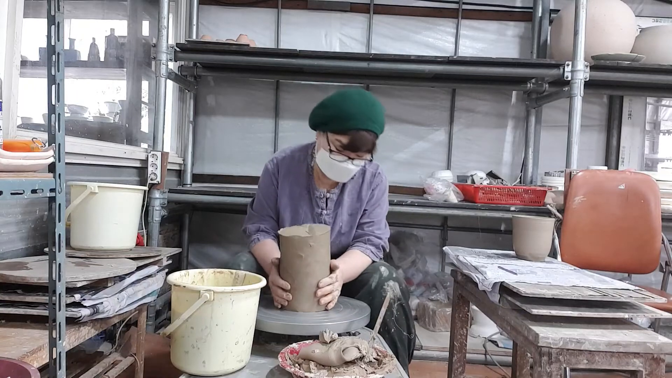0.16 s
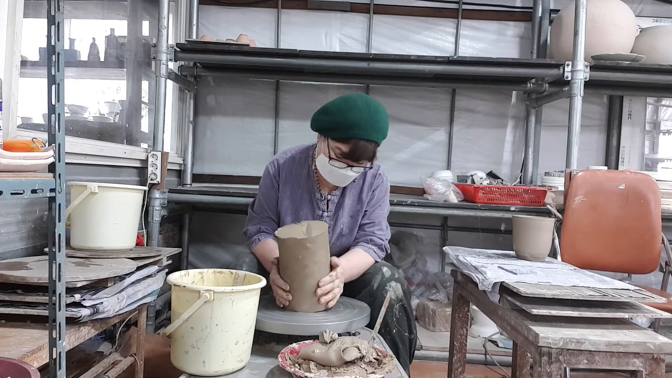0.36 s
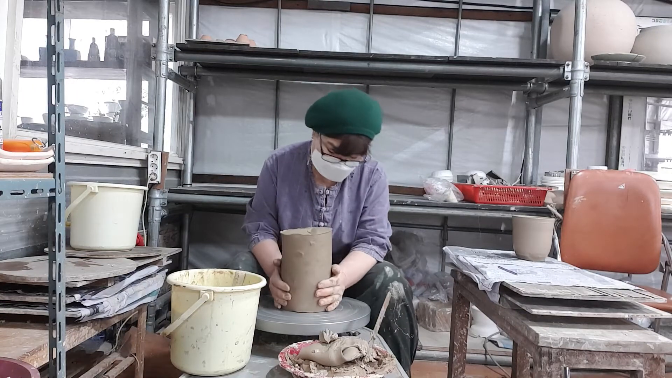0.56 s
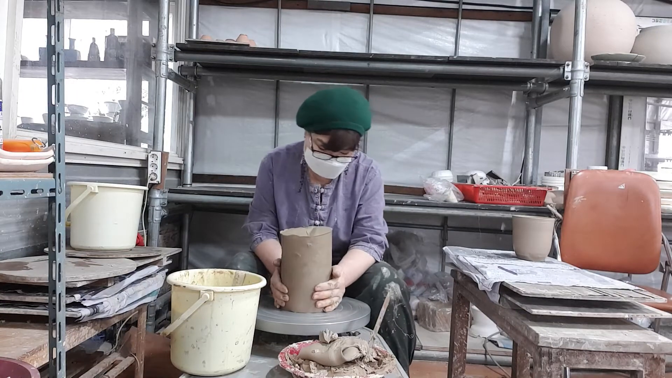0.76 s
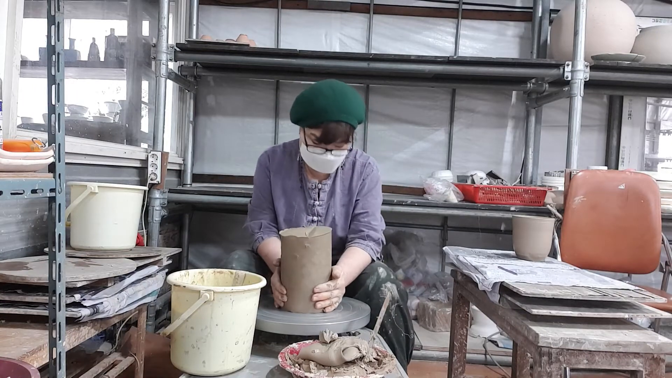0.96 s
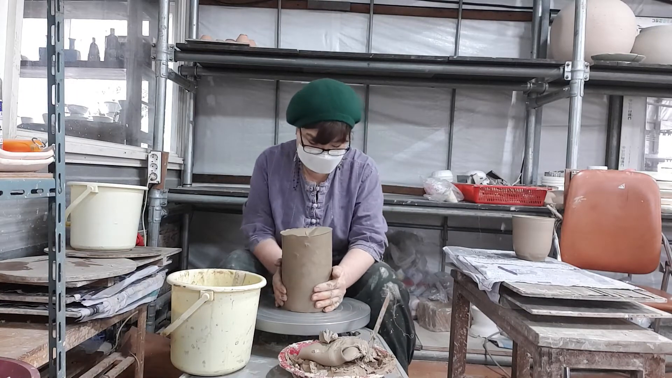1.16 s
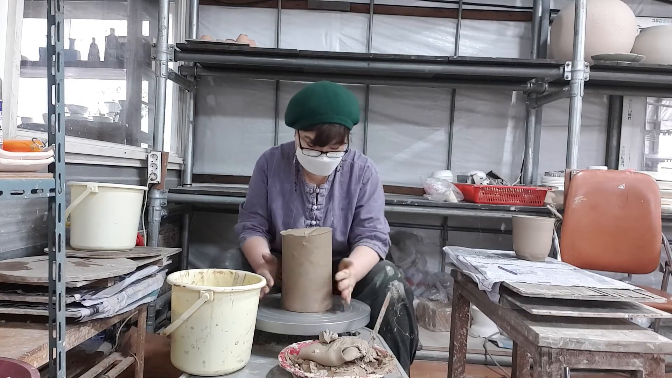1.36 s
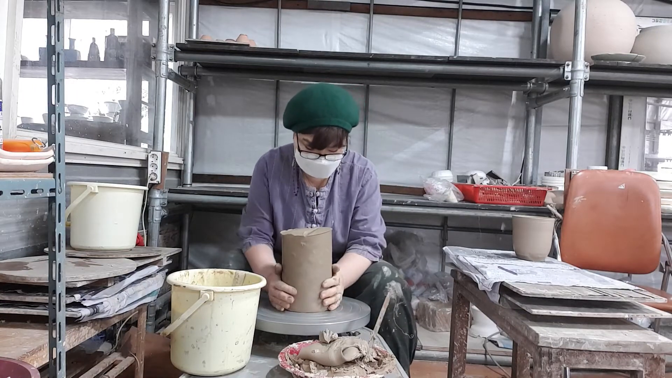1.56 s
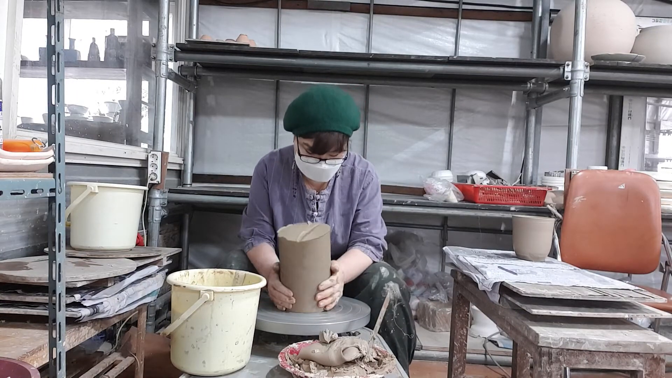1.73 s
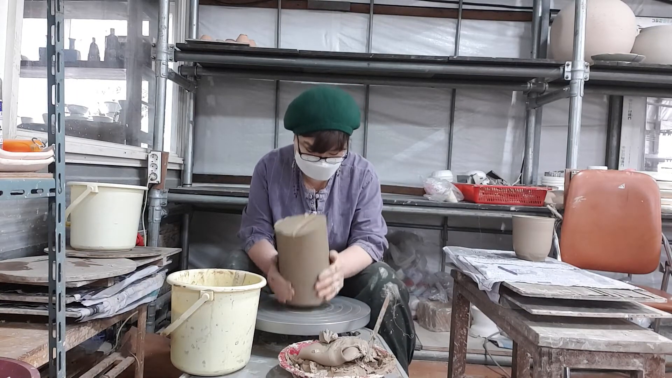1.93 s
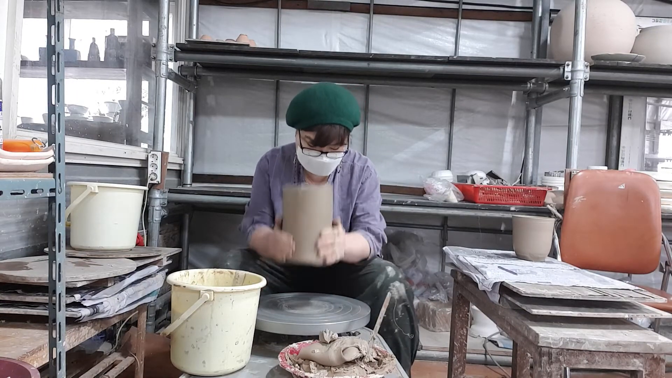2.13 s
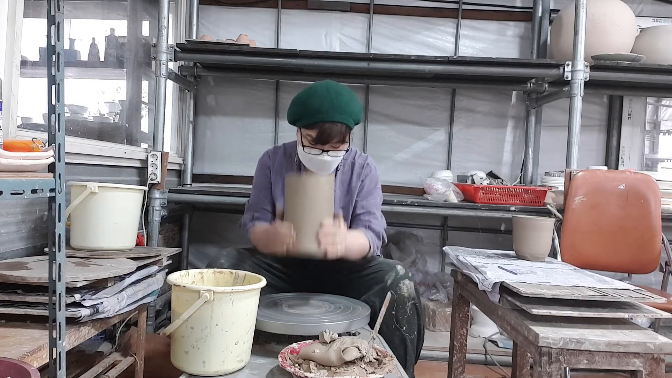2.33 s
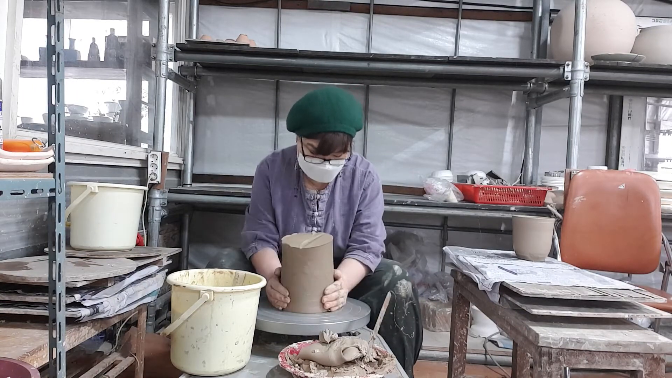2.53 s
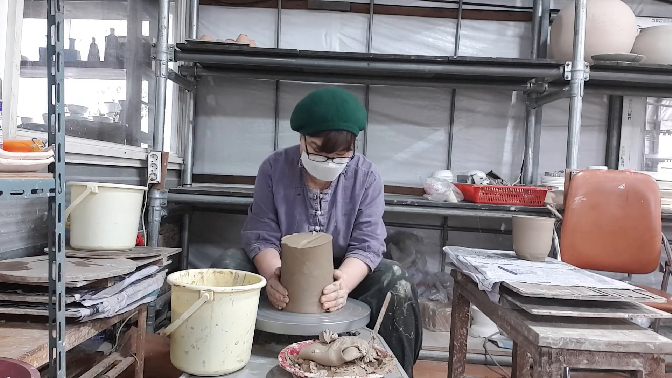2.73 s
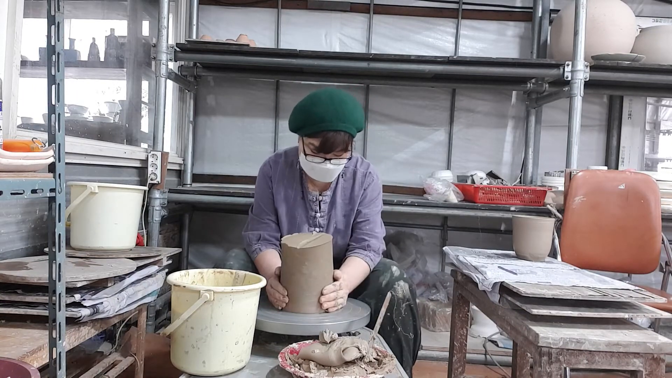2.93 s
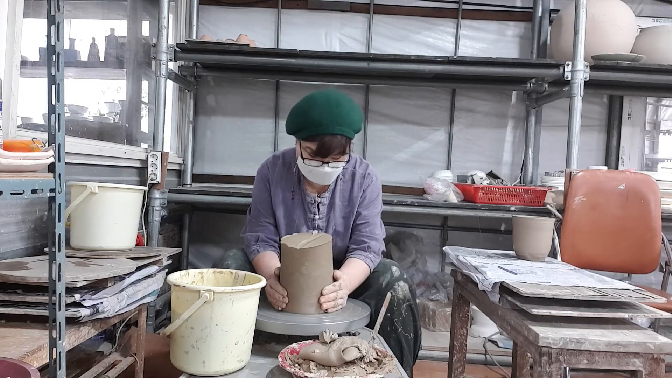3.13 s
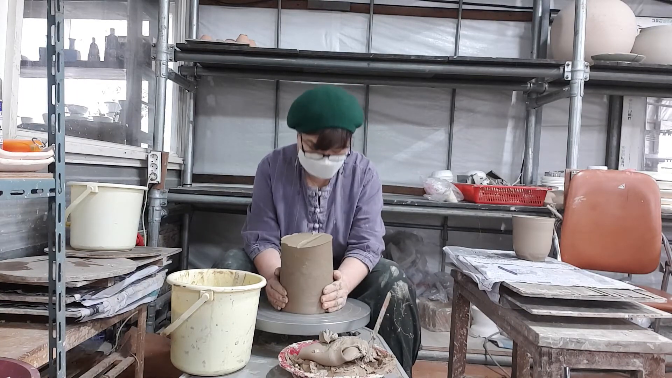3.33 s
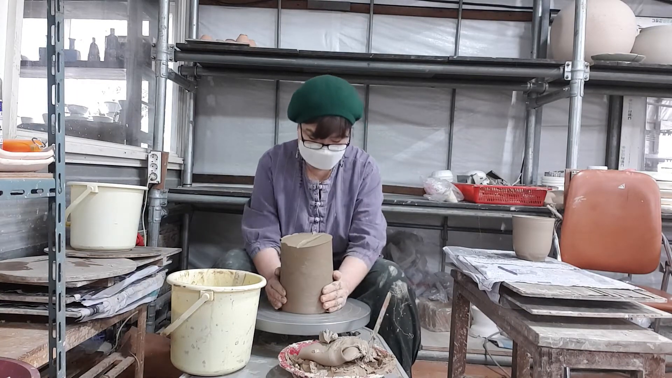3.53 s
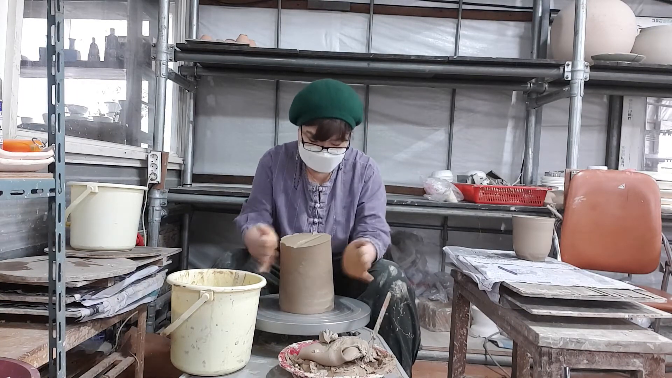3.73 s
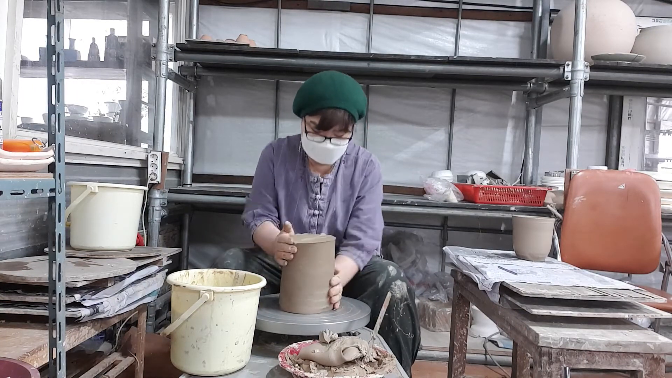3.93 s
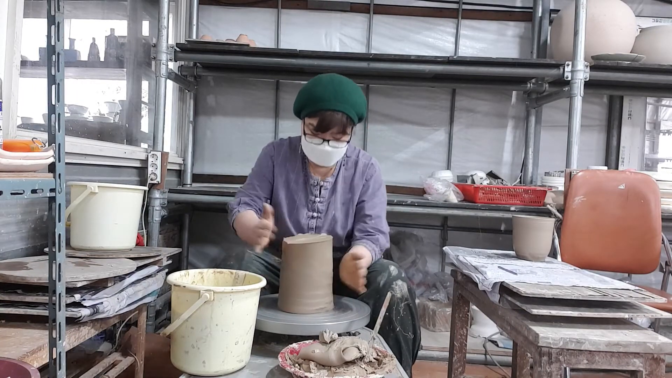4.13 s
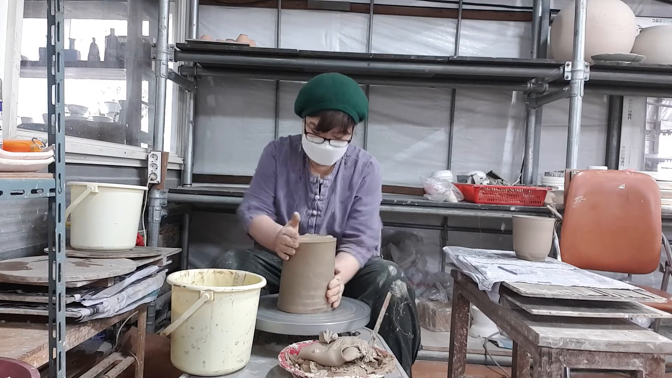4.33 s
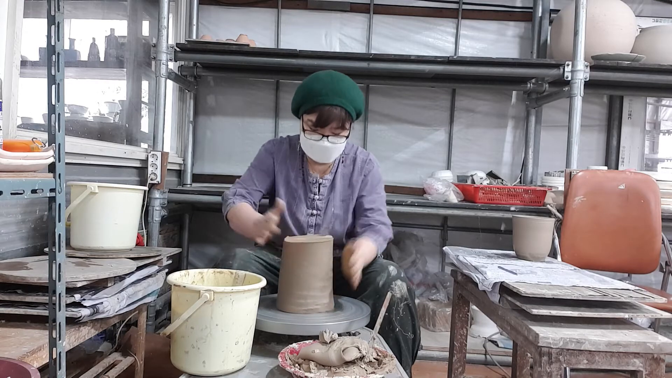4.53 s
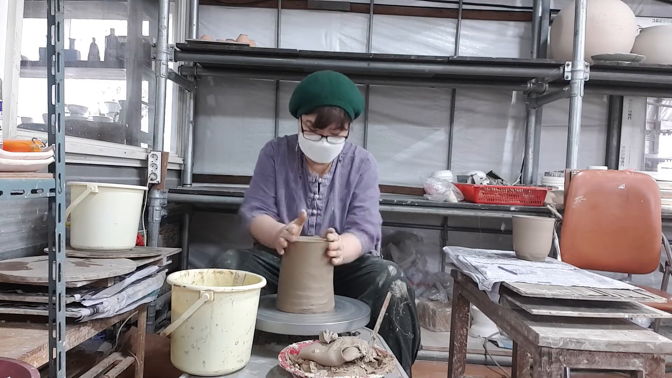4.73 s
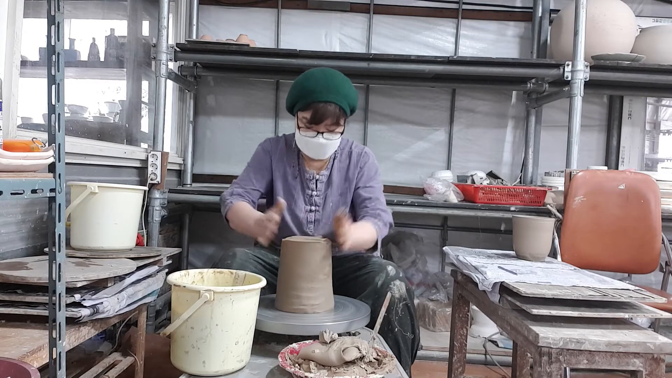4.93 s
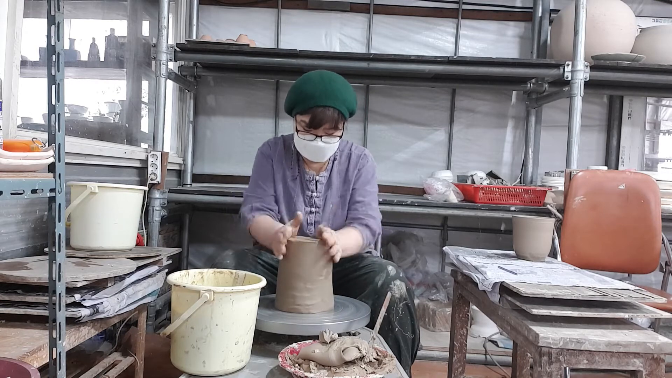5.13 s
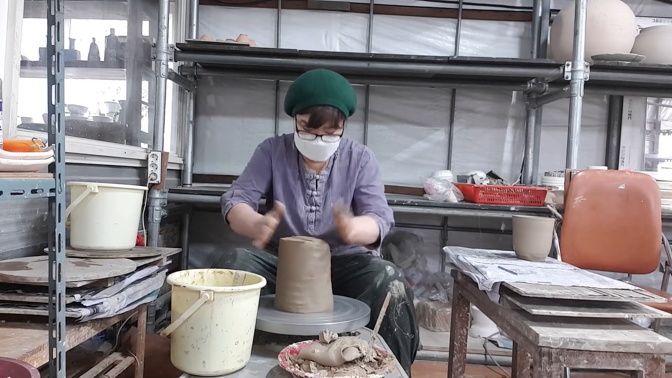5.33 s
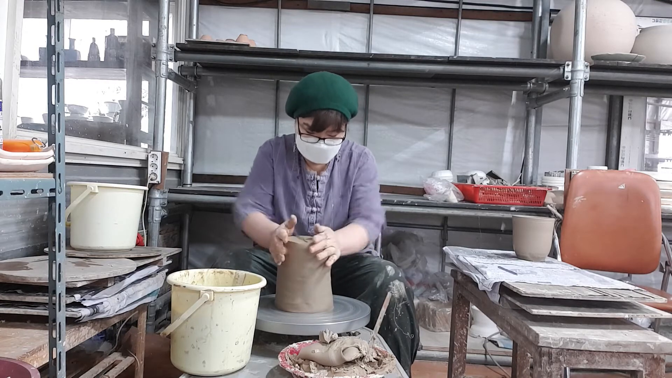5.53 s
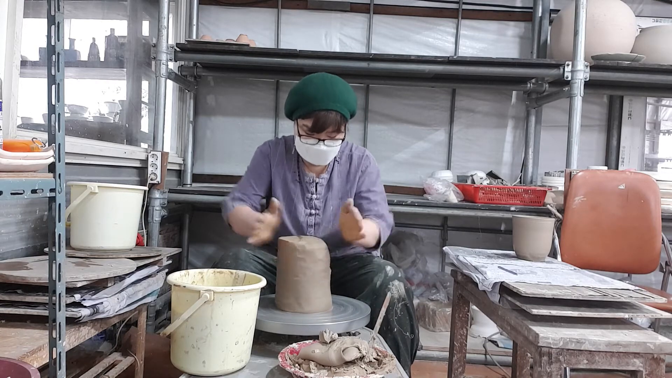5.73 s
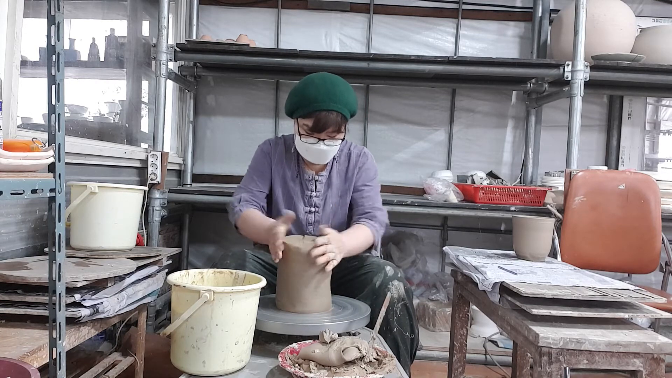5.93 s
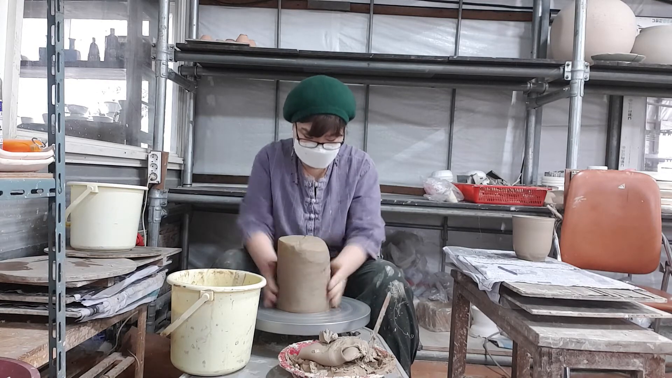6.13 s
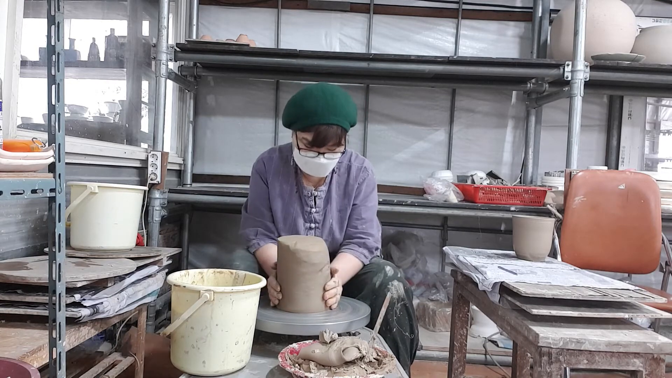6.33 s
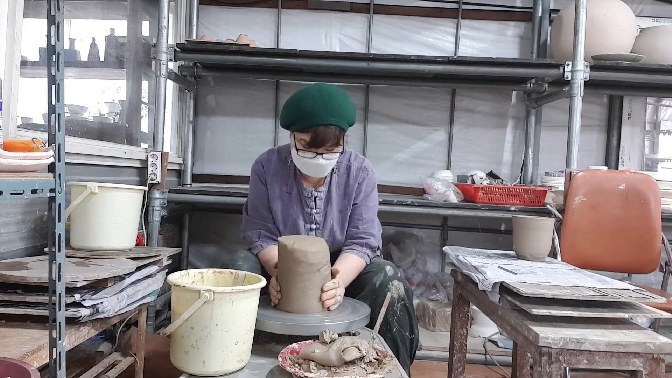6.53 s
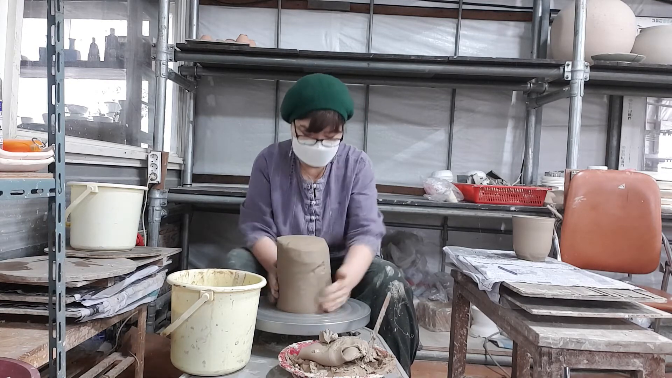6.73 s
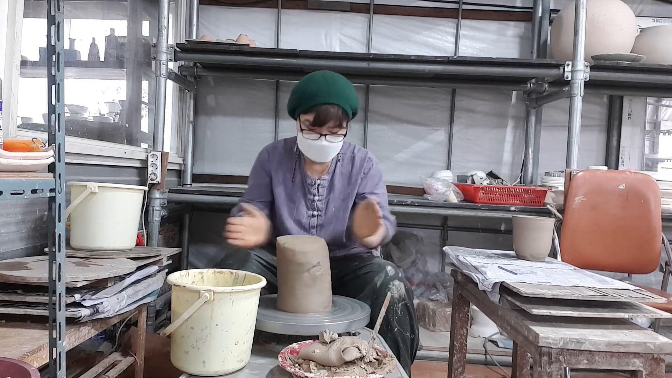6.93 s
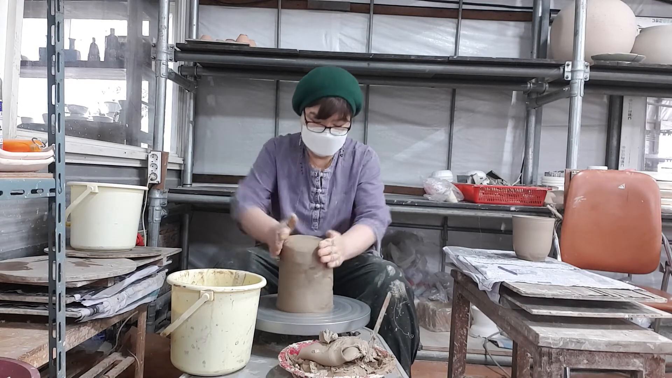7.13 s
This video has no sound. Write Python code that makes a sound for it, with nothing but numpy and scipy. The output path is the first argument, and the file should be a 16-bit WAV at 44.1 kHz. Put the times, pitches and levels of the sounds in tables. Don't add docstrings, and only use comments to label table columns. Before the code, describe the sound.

Beside a potter's wheel in a thin-walled shed, traffic rumbles beyond the walls. Wet palms hiss faintly over clay, then the lump drops with a heavy smack, metallic ring and floor thump. After a pause come uneven pats and hard slaps, with dull scraping between them. The loudest slap arrives near the end with a faint bearing squeak. Close stereo microphone, short bright room tail.

```python
import sys
import numpy as np
from scipy import signal
from scipy.fft import rfft, irfft, next_fast_len
from scipy.io import wavfile
from scipy.ndimage import uniform_filter1d, map_coordinates

SR = 44100
rng = np.random.default_rng(int(sys.argv[2]) if len(sys.argv) > 2 else 0)


def transcribe(signal):
    frames = np.atleast_2d(signal).T
    limited = np.clip(frames, -1, 1)
    pcm = np.round(limited * 32767).astype(np.int16)
    wavfile.write(sys.argv[1], SR, pcm)


def convert_level_to_amplitude(level_db):
    exponent = np.asarray(level_db, float) / 20
    return 10 ** exponent


N = 320827


def unit(x):
    return x / np.sqrt(np.mean(x ** 2) + 1e-20)


def along(points, hz):
    f, v = np.transpose(points)
    return np.interp(np.log(hz + 1), np.log(f + 1), v)


def curves(rows):
    s, *cols = np.transpose(rows)
    return [np.interp(np.arange(N) / SR, s, c) for c in cols]


def wobble(rate):
    step = max(1, int(SR / rate / 16))
    coarse = np.arange(0, N + step, step)
    knots = rng.standard_normal(int(N * rate / SR) + 4)
    smooth = map_coordinates(knots, [coarse * rate / SR], mode="nearest")
    return np.interp(np.arange(N), coarse, smooth)


def stroke(s, db, rise, fall):
    t = np.arange(N) / SR - s
    return convert_level_to_amplitude(db + 20 * np.minimum(t / rise, -t / fall))


def filtered(x, response):
    n = x.shape[-1]
    m = next_fast_len(n + 8192)
    return irfft(rfft(x, m) * response(np.fft.rfftfreq(m, 1 / SR)), m)[..., :n]


def causal(points):
    ceps = irfft(np.log(convert_level_to_amplitude(along(points, np.fft.rfftfreq(1024, 1 / SR)))))
    ceps[1:512] *= 2
    ceps[513:] = 0
    return irfft(np.exp(rfft(ceps)))[:512]


def add(out, sound, s):
    part = out[:, round(s * SR):][:, :sound.shape[1]]
    part += sound[:, :part.shape[1]]


# frequency in Hz, left-right correlation.
ALIKE = [(60, 0.84), (130, 0.9), (290, 0.91), (640, 0.31), (1410, -0.27), (3100, 0.13), (15000, -0.11)]


def rush(spectrum, patchy_db):
    z = signal.stft(rng.standard_normal((2, N)), nperseg=512)[2]
    field = uniform_filter1d(rng.standard_normal(z.shape[1:]), size=5, axis=0)
    field = uniform_filter1d(field, size=12, axis=1)
    pair = signal.istft(z * convert_level_to_amplitude(patchy_db * unit(field)), nperseg=512)[1][:, :N]

    def mid_side(hz):
        turn = np.arccos(np.clip(along(ALIKE, hz), -1, 1)) / 2
        return convert_level_to_amplitude(along(spectrum, hz)) * [np.cos(turn), np.sin(turn)]

    mid, side = filtered(pair, mid_side)
    return unit(np.array([mid + side, mid - side]))


# time in seconds, nearness as tyre roar in dB, speed as extra sizzle in dB.
ROAD = [(0, -55.5, 2), (.63, -57, 0), (1.01, -54, -1), (1.27, -51, .6), (1.62, -48, 3), (1.8, -46.5, 2),
        (2.09, -48.5, 3), (2.4, -45.5, 0), (2.83, -48.5, 0), (3.2, -47.5, 0), (3.58, -49.5, 3),
        (3.85, -47.5, 0), (4.47, -48, -2), (4.94, -45.5, 1.5), (5.61, -48, -1), (5.95, -50, 1),
        (6.66, -54, -3), (7.27, -53, -1)]
# time in seconds, deep surge in dB, exhaust surge in dB.
SURGES = [(.58, 3.5, 1.5), (.82, -3, -3), (1.02, 2.5, 0), (1.6, 9, 0), (2.09, 10, 3), (2.3, 3, 1),
          (2.83, 4, 3), (3.08, -5, 0), (3.3, 1, -2), (4.17, 7.5, -1.5), (4.6, 2.5, 0), (4.94, 8.5, 1),
          (5.18, 0, 3.5), (5.61, 1.5, 4.5), (5.85, 3, -1), (6.05, 4, 6), (7.27, 4, 0)]
# frequency in Hz, level in dB per Hz.
DEEP = [(15, -44), (28, -16.5), (45, -2), (65, -2), (90, -6), (130, -30), (300, -85.5)]
BOOM = [(50, -50), (85, -2.5), (125, -0.5), (165, -6), (210, -3.5), (270, -10), (400, -28), (900, -90.5)]
TYRES = [(150, -50), (280, -5.5), (450, -4), (650, -5.5), (900, -1), (1150, -6.5), (1600, -14.5),
         (2400, -40.5), (5000, -100)]
SIZZLE = [(700, -52), (1400, 0), (2000, -5), (2600, -15), (3400, -29.5), (5000, -35.5), (8000, -66.5)]
# level in dB, then dB of swing per dB of nearness, of speed,
# of deep surge and of exhaust surge.
FOLLOWS = [
    (-46, .1, 0, 1, 0),
    (-48.5, .5, 0, 0, 1),
    (-50, 1, 0, 0, 0),
    (-62, .7, 1, 0, 0),
]


def traffic():
    near_db, speed_db = curves(ROAD)
    t = np.arange(0, N, 64) / SR
    s, *surge_db = np.transpose(SURGES)
    half_width_s = .13
    surges = np.array(surge_db) @ np.exp(-((t - s[:, None]) / half_width_s) ** 2)
    controls = np.array([np.ones(N), near_db - near_db.mean(), speed_db, *curves(np.c_[t, surges.T])])
    out = np.zeros((2, N))
    for row, colour in zip(FOLLOWS, (DEEP, BOOM, TYRES, SIZZLE)):
        level_db = np.dot(row, controls) + 1.1 * wobble(6)
        out += convert_level_to_amplitude(level_db) * rush(colour, patchy_db=0.92)
    return out


# start in seconds, length in seconds,
# pitch in Hz, level in dB.
NOTES = [(-.05, .43, 78, -41), (1.2, .74, 67, -41), (1.98, .22, 52, -39.5), (2.2, .25, 62, -45),
         (2.48, .27, 68, -38), (2.78, .86, 65, -38), (4.5, .4, 54, -38), (5.66, .2, 59, -41),
         (5.96, .22, 53, -41), (6.36, .24, 61, -44), (6.78, .17, 63, -44), (6.95, .4, 55.5, -43),
         (-.05, .5, 120, -52), (3.18, .18, 123, -49), (3.95, .5, 120, -46.5), (4.55, .45, 117, -47),
          (5.05, .11, 116, -47), (1.13, .92, 185, -53), (2.3, .55, 188, -51), (2.92, .62, 186, -49),
          (6.0, .55, 189, -56), (6.6, .11, 189, -51)]


def engines():
    out = np.zeros(N)
    drift, flutter = .008 * wobble(12), convert_level_to_amplitude(1.5 + 2.2 * wobble(8))
    sag = -.02
    for start, length, hz, db in NOTES:
        span = slice(max(round((start - .1) * SR), 0), round((start + length + .1) * SR))
        t = np.arange(N)[span] / SR - start
        fade = np.clip(np.minimum(t, length - t) / 0.08 + .5, 0, 1)
        cycles = hz * np.cumsum(1 + sag * t + drift[span]) / SR
        out[span] += fade * convert_level_to_amplitude(db) * np.sin(2 * np.pi * cycles)
    return out * flutter


# frequency in Hz, t60 in seconds.
SHED = [(100, .3), (500, 0.24), (1500, 0.39), (3000, 0.5), (6000, 0.53), (9000, 0.46), (12000, 0.4),
        (16000, 0.34)]
# frequency in Hz, level in dB.
FILL = [(200, 1), (600, -1.5), (1500, -0.5), (3000, 0.5), (6000, 1), (9000, -1), (13000, -2), (16000, -3)]
# level in dB over the tail, t60 in seconds.
NEAR = (2.2, 0.029)


def shed(x, wet_db):
    hz, t, z = signal.stft(rng.standard_normal((2, SR * 3 // 5)), SR, nperseg=256)
    z = z + 2 * z[:1] * (hz < 400)[:, None]
    decay_db = along(FILL, hz)[:, None] - 60 * t / along(SHED, hz)[:, None]
    tail = signal.istft(z * convert_level_to_amplitude(decay_db), SR, nperseg=256)[1]
    t = np.arange(tail.shape[1]) / SR
    tail *= (1 - np.exp(-t / 0.0012)) * (1 + convert_level_to_amplitude(NEAR[0] - 60 * t / NEAR[1]))
    tail *= convert_level_to_amplitude(wet_db) / np.linalg.norm(tail, axis=1, keepdims=True)
    return signal.fftconvolve(x[None], tail, axes=1)


def bearing():
    peak_s, pitch_hz, fall_hz = 7.24, 1110, 55
    early = np.clip((peak_s - np.arange(N) / SR) / .09, 0, 1)
    phase = 2 * np.pi * np.cumsum(pitch_hz + fall_hz * early + 14 * wobble(60)) / SR
    tone = np.sin(phase) + convert_level_to_amplitude(-17) * np.sin(2.07 * phase)
    return stroke(peak_s, -51.5, rise=.18, fall=.6) * convert_level_to_amplitude(3.5 * wobble(70)) * tone


def ring(modes, rise, flip):
    t = np.arange(SR * 3 // 5) / SR
    out = np.zeros(len(t))
    for k, (hz, db, t60) in enumerate(modes):
        swell = 1 - np.exp(-t * hz / rise)
        out += flip ** k * convert_level_to_amplitude(db - 60 * t / t60) * np.sin(2 * np.pi * hz * t) * swell
    return out


# time in seconds, level in dB.
DROP = (2.4886, -14.5)
# frequency in Hz, level in dB, t60 in seconds.
FLOOR = [(68, -7.5, 0.13), (92, -5.5, 0.28), (118, 1, 0.14), (138.3, -1, .16), (160, -10, 0.02)]


def floor_thumps():
    out = np.zeros((2, N))
    boards = ring(FLOOR, rise=0.22, flip=0.94) * np.ones((2, 1))
    delay_s = .0105
    add(out, convert_level_to_amplitude(-13.5) * boards, DROP[0] + delay_s - .0008)
    for s, smack_db, weight_db, *_ in SLAPS:
        thud_db = smack_db + weight_db
        add(out, convert_level_to_amplitude(-36.5 + .3 * thud_db) * boards, s + delay_s)
    return out


# frequency in Hz, level in dB, t60 in seconds.
HEAD = [(215, -23.5, .1), (355, -12.5, .06), (453, -2.5, 0.078), (503, -8, 0.34), (630, -26.5, 0.7),
        (700, -8, 0.063), (960, -7.5, .05), (1505, -13, .05), (1680, -11, .04), (1803, -13, 0.092),
        (1856, -14, .07), (2035, -14, 0.064), (2150, -23.5, .15), (2797, -29.5, 0.37)]


def wheel_head():
    out = np.zeros((2, N))
    disc = convert_level_to_amplitude(DROP[1]) * ring(HEAD, rise=.6, flip=-1.027)
    add(out, np.array([disc, disc]), DROP[0])
    length = SR // 40
    fade_out = np.hanning(SR // 20)[length:][:length]
    add(out, shed(disc[:length] * fade_out, wet_db=-6), DROP[0])
    return out


# frequency in Hz, level in dB, t60 in seconds.
LUMP = [(415, 0, .04)]
# time of the knock in seconds, level in dB.
KNOCKS = [
    (2.4884, -20),
    (3.8177, -31.5),
]


def lump_knocks():
    out = np.zeros((2, N))
    lump = ring(LUMP, rise=.15, flip=1) * np.ones((2, 1))
    for s, db in KNOCKS:
        add(out, convert_level_to_amplitude(db) * lump, s)
    return out


# peak in seconds, level in dB, centre in Hz,
# seconds to rise or fall 20 dB.
GRIND = [(.19, -56, 566, .15), (4.842, -51, 1520, .12), (4.98, -60, 1420, .4), (4.86, -60, 2250, .25),
         (4.87, -63, 2800, .2), (5.02, -55, 1080, .25), (3.831, -49, 2250, .03), (5.2, -53, 900, .2),
         (6.255, -49, 594, .14)]


def grinding():
    rough, t = np.array([wobble(450), wobble(450)]), np.arange(N) / SR
    out = np.zeros(N)
    for s, db, hz, reach in GRIND:
        out += stroke(s, db + 1.0, reach, reach) * np.sin(2 * np.pi * hz * t)
    return rough * out


# frequency in Hz, level in dB per Hz.
RUB_COLOUR = [(1500, -37.5), (3600, -24), (5700, -13), (7600, -14), (9200, 0.5), (11000, -3), (15200, -10),
              (17000, -18.5)]
# firmest grip in seconds, level in dB, seconds to rise 20 dB,
# seconds to fall 20 dB.
RUB = [(.21, -70, .09, .17), (.52, -69.5, .04, .08), (.84, -78, .12, .11), (1.09, -86, .2, .2),
       (1.33, -83, .12, .15), (1.49, -81, .1, .12), (1.68, -71, .2, .2), (1.72, -58, .03, .33),
       (1.915, -57, .05, .095), (2.6, -88, .9, .9), (2.875, -79.5, .025, .16), (3.2, -88, .9, .9),
       (3.64, -78.5, .25, .25), (6.25, -80, .3, .3), (6.5, -87, .9, .9), (6.76, -75, .11, .17)]


def rubbing():
    level = sum(stroke(*row) for row in RUB)
    return level * unit(convert_level_to_amplitude(2.0 * wobble(900)) * rush(RUB_COLOUR, patchy_db=2.0))


def spray(contact):
    u, hz = np.arange(2048) / (contact * SR / 3), np.fft.rfftfreq(2048, 1 / SR)
    spikes = rng.standard_normal((2, len(u))) * rng.exponential(1, len(u)) ** 1.4
    z = rfft(spikes * u * np.exp(-u))
    z = z / np.sqrt(uniform_filter1d(abs(z) ** 2, size=40, axis=1))
    low = 1 / (1 + (hz / 1300) ** 4)
    push = np.exp(-2j * np.pi * hz * contact * .55)
    return irfft(np.sqrt(1 - low) * z + np.sqrt(low) * push)[:, :1024]


# time in seconds, smack in dB, weight as thud over smack in dB,
# wetness as snap over smack in dB, contact in ms.
SLAPS = [
    (1.9046, -29.5, -5, 13, 4),
    (2.4884, 1.1, 11.5, 4, 1.7),
    (3.8177, -19.5, 17.5, -6, 3),
    (3.8457, -18, 4, 3, 2.1),
    (4.2764, 0, 1.5, -10.5, 2.1),
    (4.694, -5.5, -4.5, -5.5, 1.3),
    (5.1123, -27.5, 22, 8, 1.6),
    (5.477, -20.5, 13.5, 10, 1.2),
    (5.8168, -5.5, 1.1, 10.5, 2.1),
    (7.0235, 5.5, 3, -1.1, 2.1),
]
# time in seconds, smack in dB, weight in dB, wetness in dB.
TOUCHES = [(1.892, -44, 12, 8), (2.8745, -51, 11, 7), (3.8413, -19.5, -15, -1.1), (4.2656, -16.5, -17, -3),
           (4.3515, -36, -6, 7.5), (4.6664, -32.5, 5.5, 9), (5.097, -42, 16, 6), (5.455, -36.5, 15, 2.5),
           (5.793, -46, 11, 9), (7.001, -26, -9, 9.5)]
# time in seconds, smack in dB, weight in dB,
# wetness in dB.
ROLLS = [(3.829, -27, 4, -2.1), (4.698, -13.5, -2, -4), (5.48, -19.5, -10, 9.5), (5.8192, -4, -5, 3.5),
         (7.0258, 7.5, -9, .6)]
# time in seconds, facing the microphone as direct over room in dB,
# hollow palm at 2 kHz in dB, cupping at 3 kHz in dB, sheen in dB.
FACING = [(1.9, -4, -3, 1.5, -5), (2.49, 2.1, 1.5, 4, -2.5), (3.83, 1.1, 7.5, 4, 3.5),
          (4.264, -1.5, 0, -.6, -5), (4.276, 4.5, -2.5, 3.5, 4), (4.694, 3.5, -3.5, -6.5, 1.1),
          (5.11, -3, -9, 5, .6), (5.477, .6, -1.1, -4.5, 3), (5.817, -.6, 1.5, 3.5, -1.1),
          (7.024, 2.1, -7.5, -4.5, -1.5)]


def slaps():
    out = np.zeros((2, N))
    times = np.transpose(FACING)[0]
    touch_ms, roll_ms = 1.8, 5.5
    contacts = SLAPS + [(*row, touch_ms) for row in TOUCHES] + [(*row, roll_ms) for row in ROLLS]

    def aside_share(hz):
        return .65 * hz / (hz + 3500)

    for s, smack_db, weight_db, wet_db, ms in contacts:
        direct_db, hollow_db, cup_db, sheen_db = FACING[abs(times - s).argmin()][1:]
        thud_db, snap_db, contact = smack_db + weight_db, smack_db + wet_db, ms / 1000
        clap_db = smack_db + 1.5 + hollow_db + .47 * weight_db + .55 * wet_db
        shape = causal([
            (60, thud_db - 19), (250, thud_db - 10), (430, thud_db + 2.0), (1100, thud_db - 1.0),
            (1450, clap_db - 3.5), (2100, clap_db),
            (2900, smack_db + cup_db), (4700, smack_db), (6300, smack_db),
            (7600, (smack_db + snap_db) / 2 - 2.5), (9000, snap_db + 2.5),
            (12000, snap_db + sheen_db - 3.0), (16500, snap_db + sheen_db - 6)])
        front, aside = signal.fftconvolve(spray(contact), shape[None], axes=1)
        front = filtered(front, lambda hz: np.sqrt(1 - aside_share(hz)))
        aside = filtered(aside, lambda hz: np.sqrt(aside_share(hz)))
        add(out, convert_level_to_amplitude(direct_db) * np.array([front + aside, front - aside]), s)
        add(out, shed(shape, wet_db=-1.03), s + contact / 3)
    return out


def scene():
    outside = traffic() + engines()
    wheel = bearing() + floor_thumps() + wheel_head() + lump_knocks()
    return outside + wheel + grinding() + rubbing() + slaps()


def low_pass(x):
    return signal.sosfilt(signal.butter(12, 17000, fs=SR, output="sos"), x)


# frequency in Hz, left minus right in dB.
LEAN = [(60, -2.6), (300, -2.2), (1300, -3.5), (4400, -3), (8000, -1.6), (15000, -.6)]
# frequency in Hz, level in dB per Hz.
HISS = [(1500, -22.5), (4000, -4), (7500, -11), (10000, -7.5), (13000, 2), (16000, -3)]
# frequency in Hz, level in dB.
PASS_BAND = [(11, -30), (32, 0), (15750, 0), (15950, -20), (17000, -40)]


def record(dry):
    leaning = filtered(dry, lambda hz: convert_level_to_amplitude(np.outer([.5, -.5], along(LEAN, hz))))
    hissing = leaning + convert_level_to_amplitude(-81.5) * rush(HISS, patchy_db=0.5)
    captured = filtered(hissing, lambda hz: convert_level_to_amplitude(along(PASS_BAND, hz)))
    captured = captured / (1 + abs(captured / .95) ** 6) ** (1 / 6)
    return low_pass(captured)


dry = scene()
out = record(dry)
transcribe(out)
```